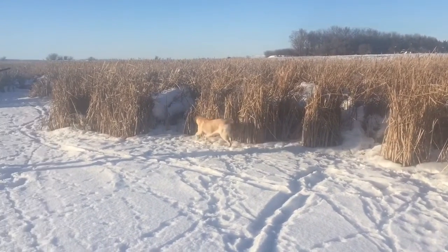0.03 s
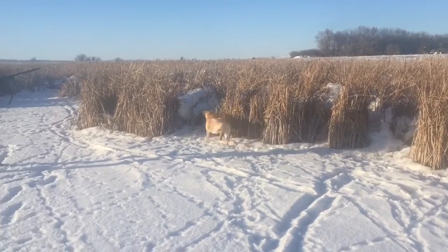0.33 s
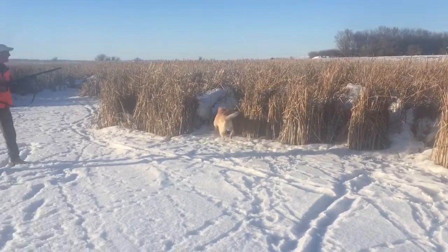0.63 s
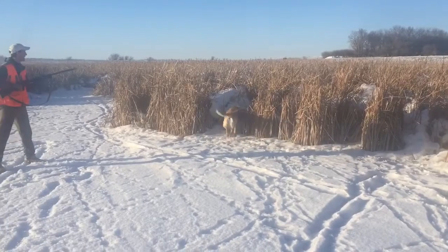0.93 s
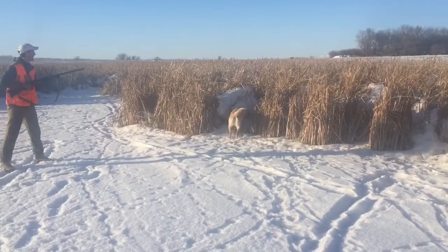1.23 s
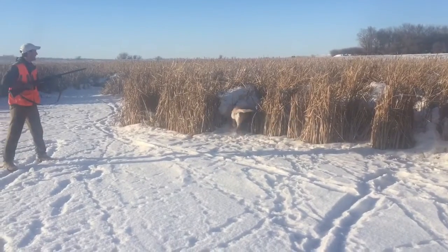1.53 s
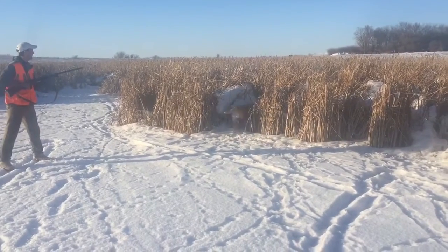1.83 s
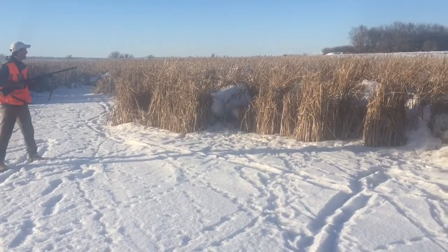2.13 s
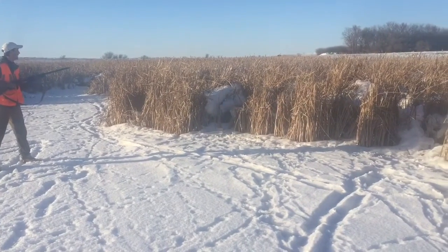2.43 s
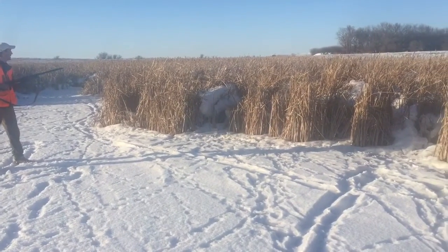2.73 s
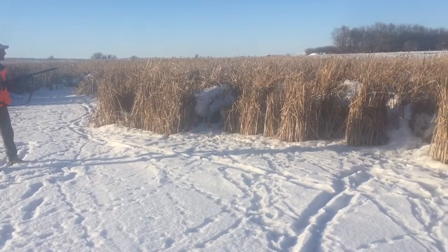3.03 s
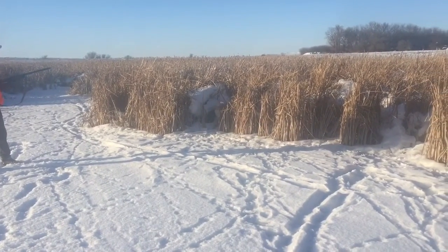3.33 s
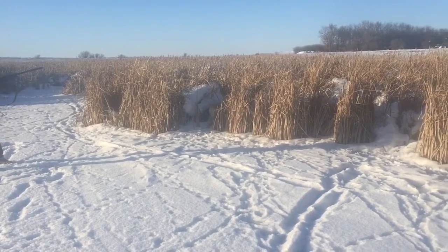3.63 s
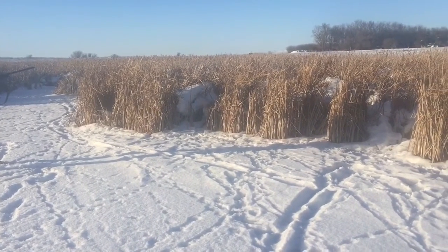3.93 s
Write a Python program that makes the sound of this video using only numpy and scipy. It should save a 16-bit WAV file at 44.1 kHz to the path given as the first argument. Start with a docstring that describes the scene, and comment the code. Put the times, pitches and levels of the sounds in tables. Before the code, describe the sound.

A dog rustles and cracks through dry cattails close by, after a tiny tinkle and faint steps in snow. Across the open field a vehicle engine drones, then sinks to a mutter as the reeds settle.

```python
"""A snowy field in open air, one microphone near a stand of dry cattails. Out of sight an engine, probably
a truck, drones under load while its tyres whirr on the snow. Close by, a dog's steps crunch, leaves stir
faintly and something small tinkles. Single stems crack; from 1.4 s the dog pushes in, rustling leaves and
crushing stalks. Near 2.6 s the throttle closes and the engine sinks to a low mutter. The reeds settle,
two more steps follow, and between them the tyres whine briefly."""
import sys
import numpy as np
from scipy import signal
from scipy.fft import rfft, irfft, next_fast_len
from scipy.io import wavfile
from scipy.ndimage import map_coordinates

SR = 44100
rng = np.random.default_rng(int(sys.argv[2]) if len(sys.argv) > 2 else 0)


def to_wav(s):
    """Save 16-bit WAV."""
    ch = np.atleast_2d(s).T  # columns
    pcm = np.round(np.clip(ch, -1, 1) * 32767)  # PCM
    wavfile.write(sys.argv[1], SR, pcm.astype(np.int16))


N = 176400


def amp(db):
    """Decibels to gain."""
    return 10 ** (np.asarray(db) / 20)


def unit(x):
    """x scaled to rms 1."""
    return x / np.sqrt(np.mean(x ** 2) + 1e-20)


def clock():
    """The time of each sample in seconds."""
    return np.arange(N) / SR


def curves(rows):
    """One value per sample for each column after the time."""
    times, *columns = np.transpose(rows)
    return [np.interp(clock(), times, column) for column in columns]


def wobble(rate):
    """A smooth random curve, rate knots a second."""
    return map_coordinates(rng.standard_normal(N // 20), [clock() * rate + 2], mode="wrap")


def coloured(x, points):
    """x through a causal filter of unit power, shaped by (frequency [Hz], level [dB]) points."""
    size = 2 * next_fast_len(N)
    hz, db = np.transpose(points)
    gain = unit(amp(np.interp(np.log(np.fft.rfftfreq(size, 1 / SR) + 1), np.log(hz), db)))
    cepstrum = irfft(np.log(gain))
    cepstrum[1:size // 2] *= 2  # folded onto positive time for minimum phase
    cepstrum[size // 2 + 1:] = 0
    return irfft(rfft(x, size) * np.exp(rfft(cepstrum)))[:N]


def noise(points):
    """Coloured noise of rms 1 that falls away above its last point."""
    roll_off = (2 * points[-1][0], -100)
    return unit(coloured(rng.standard_normal(N), list(points) + [roll_off]))


def narrow(hz, width_hz):
    """A narrow band of noise around a steady or moving frequency, rms 1."""
    phase = 2 * np.pi * np.cumsum(hz * np.ones(N)) / SR
    return unit(wobble(2 * width_hz) * np.cos(phase) + wobble(2 * width_hz) * np.sin(phase))


def crackle(rate, spread_db):
    """Tiny fractures of uneven size at random moments, rms 1."""
    size = amp(spread_db * np.minimum(rng.standard_normal(N), 2)) * rng.choice([-1, 1], N)
    return unit(size * (rng.random(N) < rate / SR))


def patchy(x, depth_db, patch_hz, patch_s):
    """x with random rises and dips of level over patches of frequency and time."""
    hz, t, spectrum = signal.stft(x, SR, nperseg=512)
    grid = np.meshgrid(np.minimum(hz / patch_hz, 200), np.minimum(t / patch_s, 400), indexing="ij")
    patches = map_coordinates(rng.standard_normal((201, 401)), grid)
    return signal.istft(spectrum * unit(amp(depth_db * patches)), SR, nperseg=512)[1][:N]


def engine():
    """Out of sight, six firings to a cycle: exhaust lines and cylinder buzz over a rasp and a rumble."""
    # engine speed (time [s], cycle rate [Hz])
    speed = [(0, 14.68), (1, 14.8), (2.2, 14.89), (2.42, 14.78), (2.65, 14.33), (2.85, 13.3), (3, 12.7),
             (3.5, 12.2), (4, 12.46)]
    # exhaust under load (time [s], level [dB])
    load = [(0, -42), (.3, -38), (1.1, -37), (2.05, -36), (2.42, -37.5), (2.58, -41), (2.72, -57),
            (2.9, -54.5), (3.081, -73), (3.6, -64.5), (3.8, -62), (3.86, -55), (4, -57)]
    # overtone strength against the firing tone (time [s], level [dB])
    brightness = [(0, 1.5), (.8, 3.5), (1.498, 1.5), (2.199, -4), (2.55, -3), (2.75, 3), (2.9, -3),
                  (3.08, 18), (3.6, 4.5), (3.7, 16.5), (3.858, 6.5), (4, 12)]
    # strong exhaust lines, firing tone first (order [x cycle rate], level [dB], share of brightness [1])
    exhaust_lines = [(6, 0, 0), (9, -12, -0.085), (12, -8, 1)]
    # weaker lines from the unequal cylinders (order [x cycle rate], level [dB])
    cylinder_lines = [(14, -5), (16, -7), (19, -5), (24, -6), (26, -7.5), (28, -9), (29, -4), (32, -11.5)]
    # buzz of the weaker lines (time [s], lower lines [dB], upper lines [dB])
    buzz_levels = [(0, -58.5, -66), (.42, -66, -65), (.7, -61.5, -57.5), (1.5, -59.5, -60),
                   (2.1, -66, -70.5), (2.6, -73, -77), (3.7, -95, -82), (3.93, -66, -73)]
    # two lines that swell and fade on their own (lower order [x cycle rate], upper order [x cycle rate])
    drone_orders = (18, 23)
    # their swells (time [s], lower drone [dB], upper drone [dB])
    drone_levels = [(0, -79, -57.5), (.2, -71, -53), (.45, -75, -60.5), (.78, -71, -74), (1.2, -58.5, -67),
                    (1.7, -62, -61), (2.05, -62.5, -69), (2.4, -95, -82), (2.9, -92, -98)]
    # rumble spectrum (frequency [Hz], level [dB])
    rumble_colour = [(20, -22), (45, -6), (70, 2.5), (110, 2), (150, 9), (210, -6.5), (280, -9.5),
                     (500, -13), (1000, -48)]
    (cycle_hz,), (load_db,), (bright_db,) = map(curves, (speed, load, brightness))
    lower_db, upper_db = curves(buzz_levels)
    phase = 2 * np.pi * np.cumsum(cycle_hz) / SR + .004 * wobble(30)
    exhaust, buzz = np.zeros(N), np.zeros(N)
    for i, (order, db, share) in enumerate(exhaust_lines):
        colour_db = share * bright_db + .6 * wobble(18) if i else .25 * wobble(29.66)
        lag = 2 * np.pi * .013 * i
        exhaust += amp(db + colour_db) * np.cos(order * phase - lag)
    for order in range(10, 35):
        line_db = dict(cylinder_lines).get(order, -19) + (lower_db if order < 25 else upper_db)
        gain = amp(line_db + 2.5 * wobble(10))
        buzz += gain * np.cos(order * phase + 2 * np.pi * rng.random() + .3 * wobble(10))
    for order, drone_db in zip(drone_orders, curves(drone_levels)):
        buzz += amp(drone_db) * (np.cos(order * phase) + .35 * narrow(order * cycle_hz, width_hz=55))
    rasp = amp(upper_db - 2.5) * narrow(hz=415, width_hz=55)
    rumble = amp(-53.5 + .31 * (load_db - load_db.max())) * noise(rumble_colour)
    return np.sqrt(2) * (amp(load_db) * exhaust + buzz) + rasp + rumble


def tyres():
    """Tyres churn and whirr unevenly over the snow, with one brief whine."""
    # tyres on snow (time [s], dull churn [dB], brighter whirr [dB])
    levels = [(0, -68, -70.5), (.45, -70.5, -69.5), (.72, -61, -73), (1.1, -65, -65.5), (1.45, -63, -58.5),
              (2.2, -73, -59), (2.7, -65.5, -69), (3.12, -68.5, -65), (3.5, -68.5, -64), (4, -76, -70.5)]
    # churn spectrum (frequency [Hz], level [dB])
    churn_colour = [(200, -8.5), (450, -3), (600, 0), (720, 0), (900, -7.5), (1300, -22), (2500, -31)]
    # whirr spectrum (frequency [Hz], level [dB])
    whirr_colour = [(400, -28), (700, -7.5), (880, 3.5), (1020, -3), (1260, 0.5), (1450, -7.5),
                    (1650, -7.5), (2100, -37), (5000, -31)]
    churn_db, whirr_db = curves(levels)
    churn = amp(churn_db + .3 * wobble(12)) * noise(churn_colour)
    whirr = amp(whirr_db + .26 * wobble(16)) * noise(whirr_colour)
    rolling = patchy(churn + whirr, depth_db=2.5, patch_hz=128.7, patch_s=.06)
    swell = np.exp(-((clock() - 3.1) / .14) ** 6)  # flat-topped, centred on 3.1 s
    whine = amp(-65) * swell * narrow(hz=875, width_hz=55)
    return rolling + whine


def steps():
    """Near the microphone, snow packs under each paw: a soft rise and a fading crunch."""
    # paws landing (time [s], level [dB], length [s])
    footfalls = [(-.02, -62.5, 0.11), (0.213, -61, 0.14), (0.486, -61.5, 0.18), (0.78, -69, 0.31),
                 (1.092, -74, 0.25), (2.926, -65, .11), (3.438, -69, 0.17)]
    # spectrum of packing snow (frequency [Hz], level [dB])
    snow_colour = [(300, -9), (1500, 6.5), (4500, 3), (8500, 2), (15800, 3.5)]
    rise_s = .0054
    pressure = np.zeros(N)
    for start, db, length in footfalls:
        age = np.maximum(clock() - start, 0)
        pressure += amp(db) * (1 - np.exp(-age / rise_s)) * np.exp(-2 * (age / length) ** 2)
    grains = crackle(rate=6500, spread_db=4) * amp(1.5 * wobble(90))
    return coloured(pressure * grains, snow_colour)


def leaves():
    """Dry leaves scrape along the dog in clumps of fine crackle, each clump with its own colour."""
    # how hard the dog presses through (time [s], level [dB])
    push = [(0, -73), (.7, -78), (.82, -70), (1.31, -74), (1.45, -58), (1.56, -61.5), (1.64, -51.5),
            (1.72, -66), (1.86, -64), (1.97, -50.5), (2.06, -51.5), (2.13, -57.5), (2.175, -50.5),
            (2.19, -62.5), (2.24, -51), (2.36, -50.5), (2.42, -56), (2.48, -57), (2.52, -66), (2.7, -78.5)]
    # dry leaf spectrum (frequency [Hz], level [dB])
    leaf_colour = [(100, -49), (400, 1.5), (1200, -4), (2500, 0.5), (4000, 1), (5000, -3.5), (6600, 3),
                   (7600, -6), (9000, -1), (15800, -4)]
    push_db, = curves(push)
    grains = crackle(rate=6000, spread_db=5.5) * amp(2.2 * wobble(130))
    rustle = coloured(amp(push_db) * grains, leaf_colour)
    return patchy(rustle, depth_db=2.5, patch_hz=576, patch_s=.022)


def tag():
    """A small piece of metal close by, probably a collar tag, rings and scrapes at each touch."""
    # touches (time [s], ring [dB], scrape [dB])
    touches = [(0.0362, -37.5, -67), (0.066, -47, -55), (0.099, -51, -58), (0.113, -49, -48.5),
               (0.12, -52, -51)]
    # modes of the metal (frequency [Hz], level [dB], time to fall 60 dB [s])
    modes = [(8320, 0, .033), (8530, -11, .05), (12350, -29, .07), (13200, -25, .05), (13900, -21, .07),
             (14700, -24, .08)]
    # scrape spectrum (frequency [Hz], level [dB])
    scrape_colour = [(3000, -20), (6500, -15), (8600, 7), (10500, -10), (15000, -3)]
    rise_s, scrape_t60_s = .0005, .051
    rings, scrapes = np.zeros(N), np.zeros(N)
    age = np.arange(SR // 5) / SR
    for start, ring_db, scrape_db in touches:
        ring = np.zeros(len(age))
        for hz, db, t60 in modes:
            decay = amp(db + rng.normal(0, 1) - 60 * age / t60)
            ring += decay * np.sin(2 * np.pi * (hz * age + rng.random()))
        rings[round(start * SR):][:len(age)] += amp(ring_db) * ring * (1 - np.exp(-age / rise_s))
        scrapes[round(start * SR):][:len(age)] += amp(scrape_db - 60 * age / scrape_t60_s)
    return rings + scrapes * noise(scrape_colour)


def stalks():
    """Crushed stalks splinter and sound their hollow stems; single stems snap with a short woody ring."""
    # stalks crushed (time [s], level [dB], time to fall 20 dB [s], stem resonance [Hz])
    crunches = [(1.202, -60, .014, 6500), (1.338, -54, 0.026, 7000), (1.386, -58.5, .03, 7300),
                (1.431, -52.5, 0.037, 4140), (1.581, -51.5, 0.075, 6830), (1.6094, -38, 0.039, 1696),
                (1.645, -39.5, 0.025, 1816), (1.817, -48.5, 0.011, 6100), (1.934, -45, 0.031, 4330),
                (1.956, -48.5, 0.044, 4000), (1.984, -49.5, 0.056, 6500), (2.023, -48, 0.045, 2600),
                (2.035, -50.5, 0.033, 6360), (2.143, -45.5, 0.042, 6200), (2.197, -41.5, 0.023, 1480),
                (2.208, -41, 0.03, 1710), (2.324, -38, 0.021, 1210), (2.346, -38.5, 0.033, 3400),
                (2.439, -48.5, 0.078, 2530)]
    # single stems snapping (time [s], level [dB])
    snaps = [(0.5088, -50), (.7754, -51), (0.969, -49.5), (1.03, -48), (1.4112, -42), (1.4479, -35),
             (1.478, -50), (1.5807, -43), (1.6255, -24), (1.6517, -23), (1.6759, -33), (1.7683, -50),
             (1.9126, -38.5), (1.9385, -30), (2.0383, -34), (2.0835, -34.5), (2.151, -36), (2.2118, -35),
             (2.2655, -30.5), (2.3212, -19)]
    rise_s, crack_s, ring_s, ring_hz, stem_width_hz = .0012, .0014, .0013, 3400, 600
    breaks, stems = np.zeros(N), np.zeros(N)
    splinters = crackle(rate=8000, spread_db=4)
    hollow = wobble(2 * stem_width_hz)  # spreads each resonance into a band
    for start, db, length, hz in crunches:
        age = np.maximum(clock() - start, 0)
        envelope = (1 - np.exp(-age / rise_s)) * amp(db - 20 * age / length)
        breaks += envelope * splinters
        stems += amp(-5.5) * envelope * hollow * np.sin(2 * np.pi * hz * age)
    age = np.arange(SR // 50) / SR
    for start, db in snaps:
        crack = amp(-10) * np.exp(-age / crack_s) * rng.uniform(-1.5, 1.5, len(age))
        crack[0] = 1  # the break itself, ahead of its noisy tail
        ring = np.exp(-age / ring_s) * np.sin(2 * np.pi * ring_hz * rng.uniform(.85, 1.15) * age)
        breaks[round(start * SR):][:len(age)] += amp(db) * crack
        stems[round(start * SR):][:len(age)] += amp(db - 11) * ring
    # spectrum of breaking stalks (frequency [Hz], level [dB])
    stalk_colour = [(100, -34), (300, -31), (800, -2.5), (1400, 3), (2100, -2.5), (3000, 1), (5000, -1),
                    (6700, 0), (9000, 0.5), (10500, -1.5), (15800, -4.5)]
    return coloured(breaks, stalk_colour) + stems


def reed_scatter(x, t60_s=.13, level_db=-11):
    """The wall of reeds adds a short diffuse tail."""
    t = np.arange(SR // 3) / SR
    tail = rng.standard_normal(len(t)) * amp(-60 * t / t60_s)
    return x + amp(level_db) * signal.fftconvolve(x, tail / np.linalg.norm(tail))[:N]


def scene():
    """At the microphone: the dog close by among the reeds, over the unseen vehicle and a faint hiss."""
    # open-air hiss (frequency [Hz], level [dB])
    air_colour = [(1060, -29.5), (1800, 5.5), (2360, 2), (6000, -4), (11000, -8), (15500, -18)]
    near = reed_scatter(leaves() + stalks() + steps() + tag())
    return (near + engine() + tyres() + amp(-76.5) * noise(air_colour))[None]


def record(dry):
    """One microphone into a recorder that keeps nothing above its band limit."""
    top_hz = 15900
    size = next_fast_len(N + SR // 2)
    passband = np.fft.rfftfreq(size, 1 / SR) < top_hz
    return irfft(rfft(dry, size) * passband, size)[..., :N]


dry = scene()
out = record(dry)
to_wav(out)
```